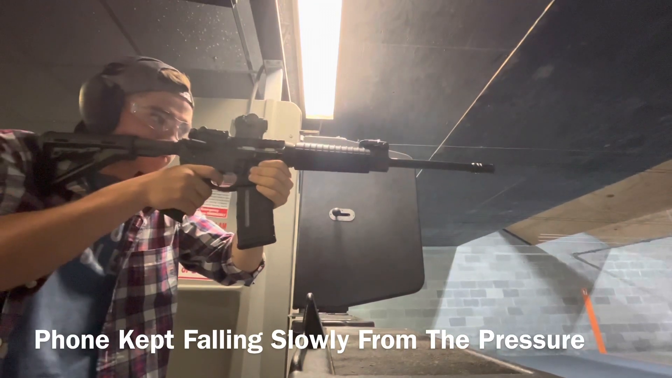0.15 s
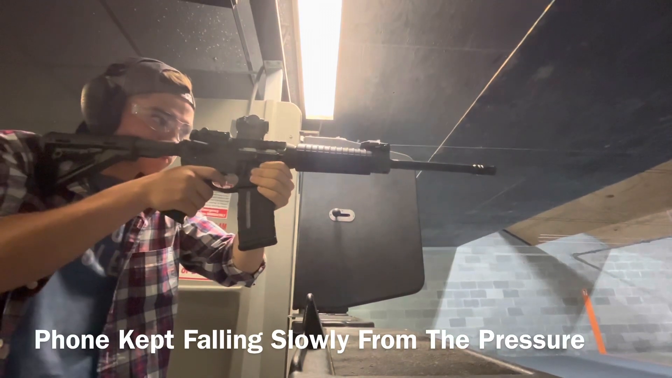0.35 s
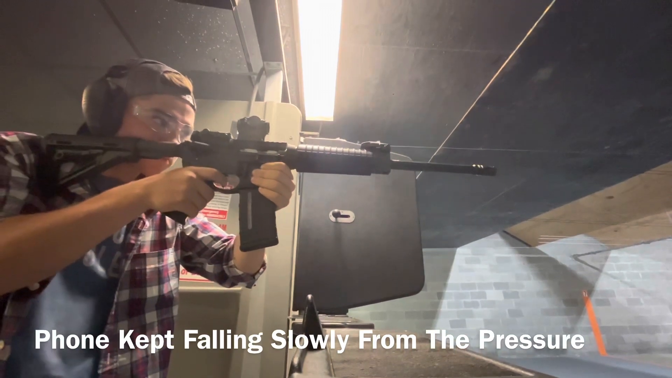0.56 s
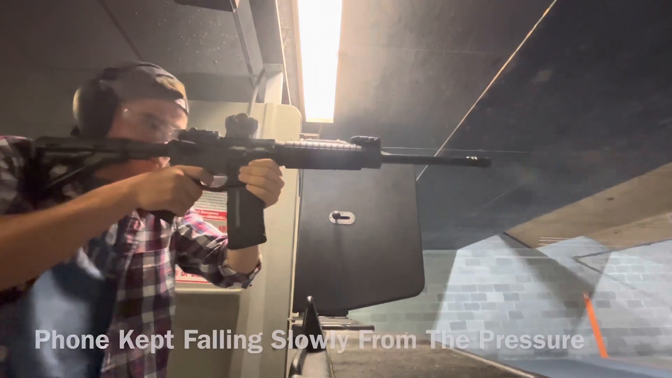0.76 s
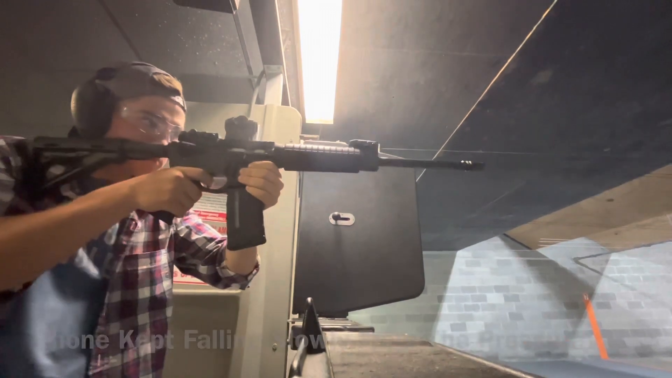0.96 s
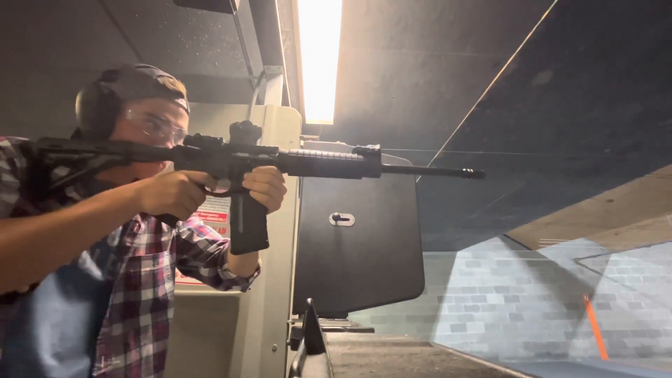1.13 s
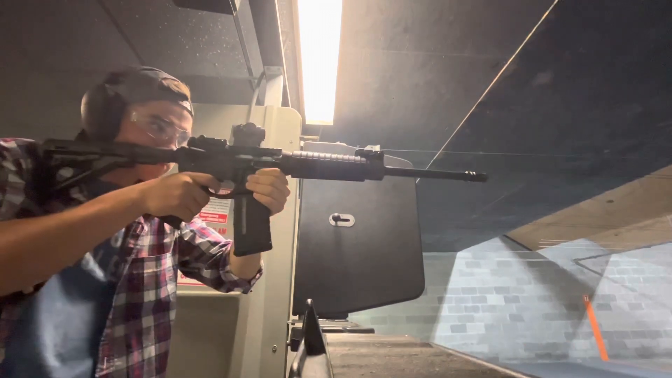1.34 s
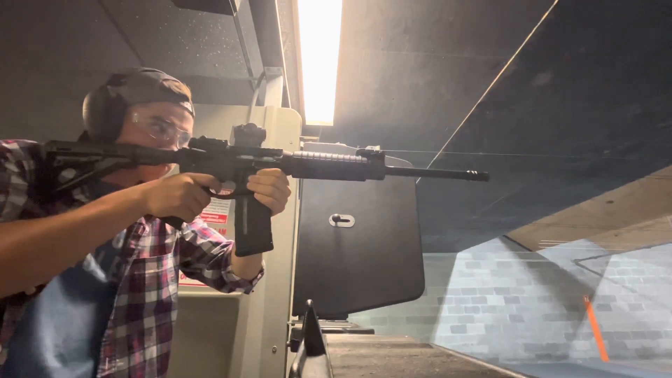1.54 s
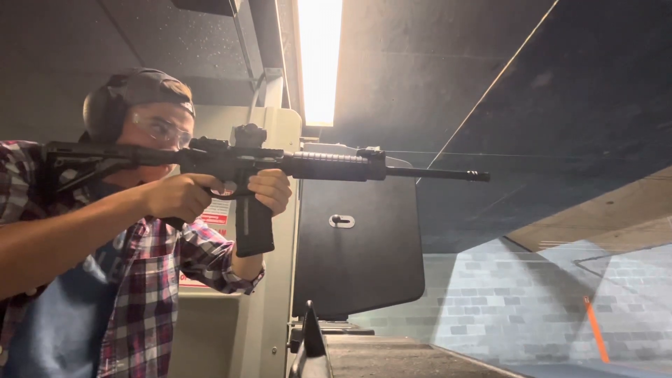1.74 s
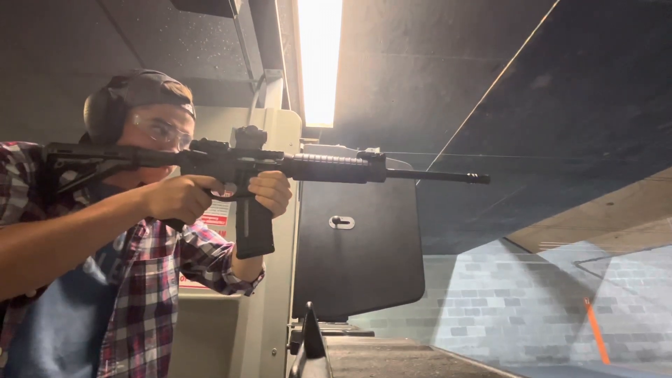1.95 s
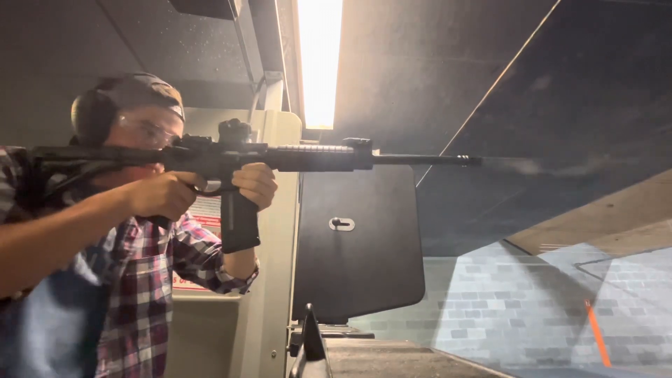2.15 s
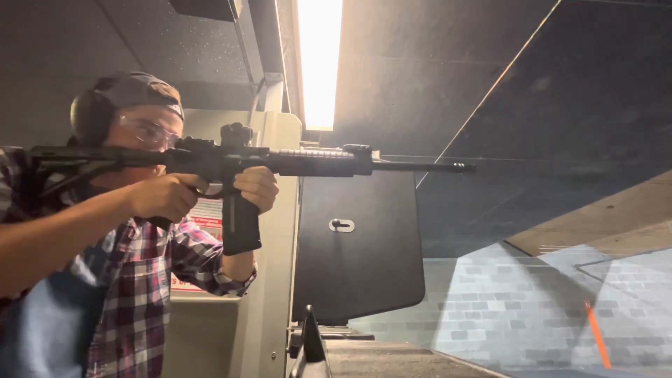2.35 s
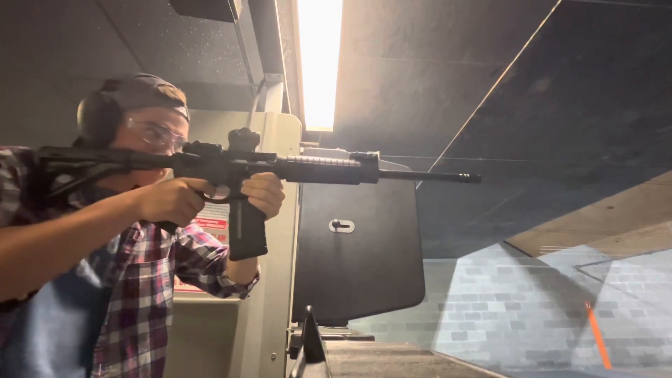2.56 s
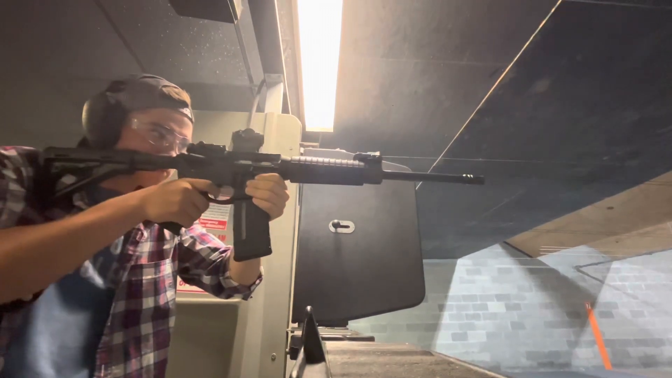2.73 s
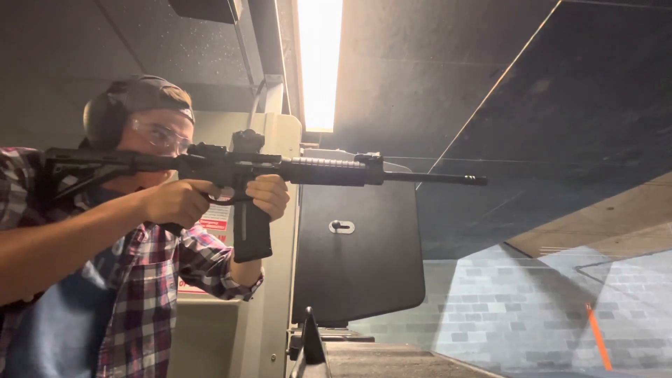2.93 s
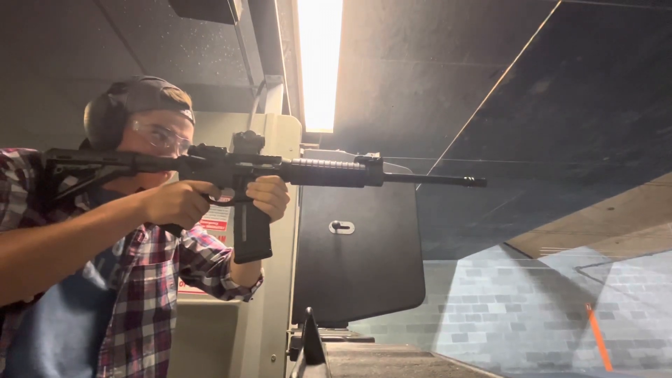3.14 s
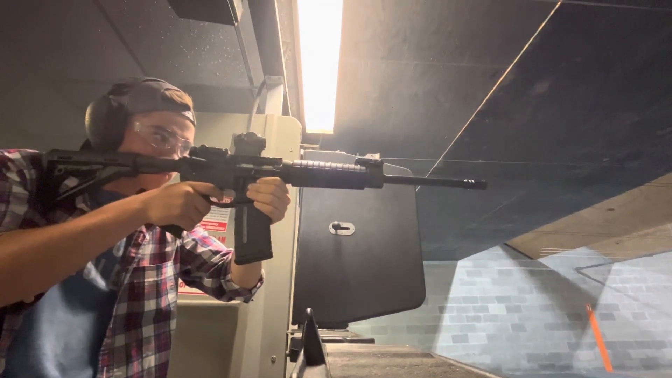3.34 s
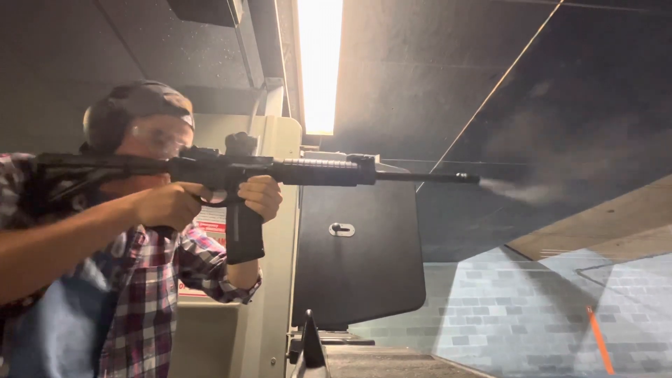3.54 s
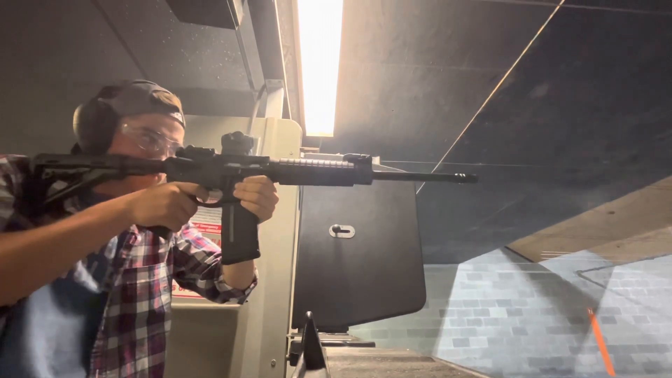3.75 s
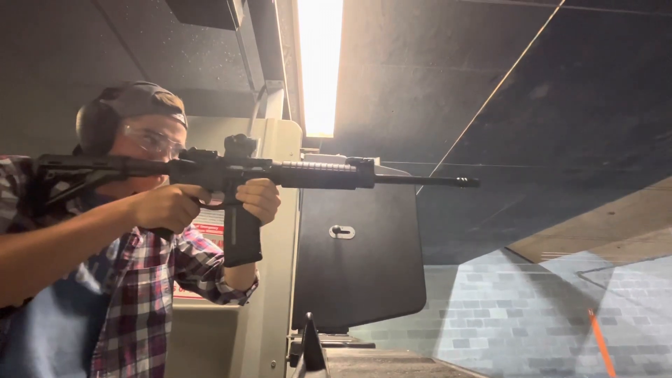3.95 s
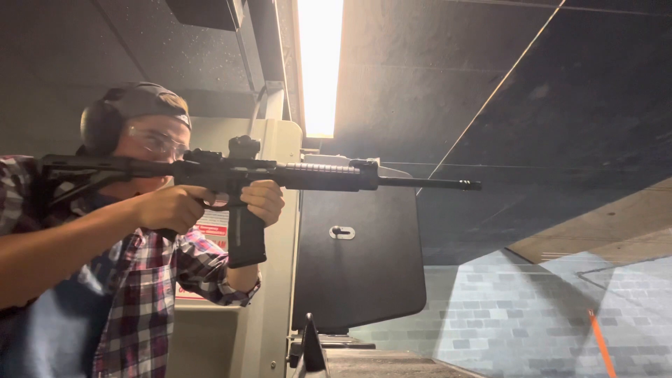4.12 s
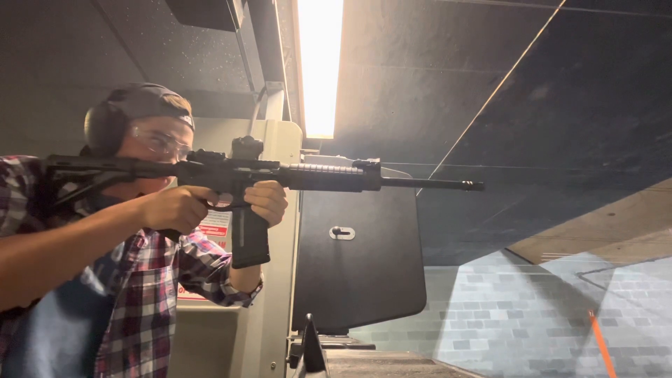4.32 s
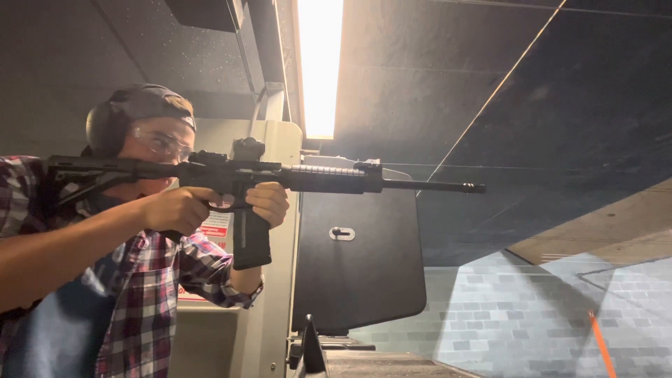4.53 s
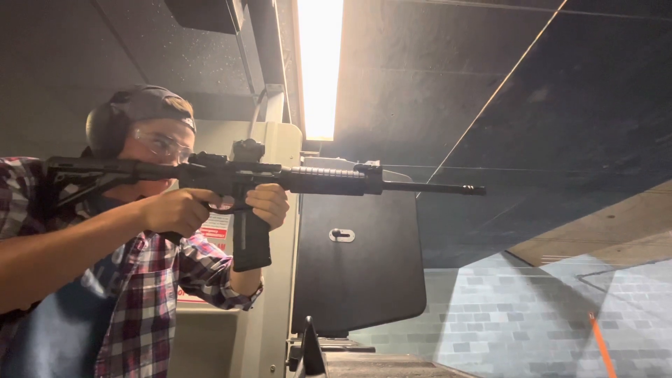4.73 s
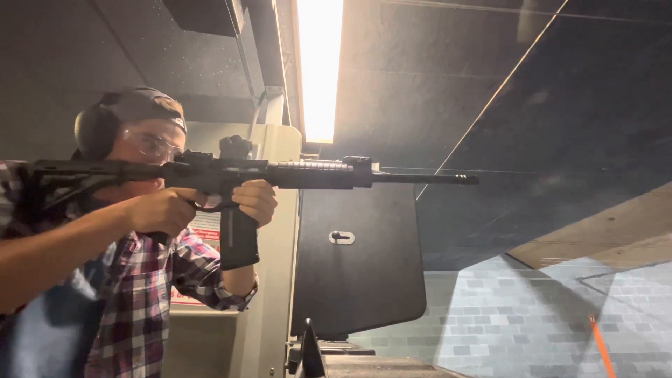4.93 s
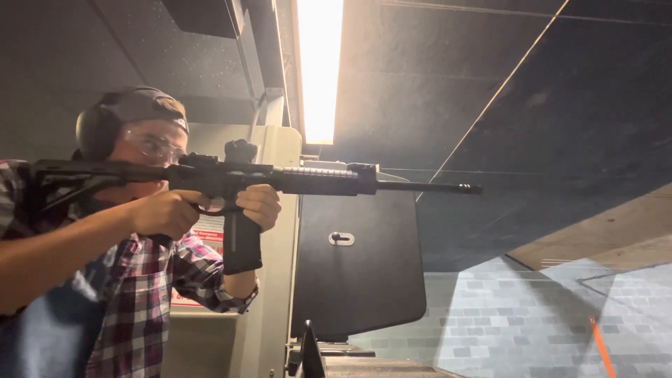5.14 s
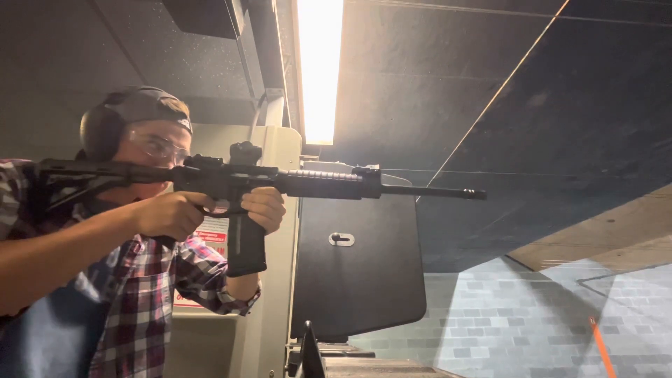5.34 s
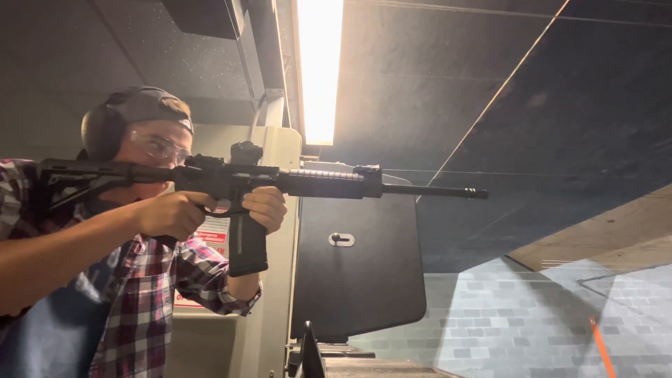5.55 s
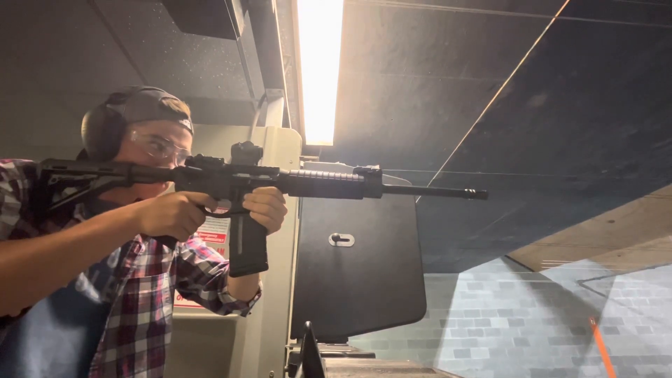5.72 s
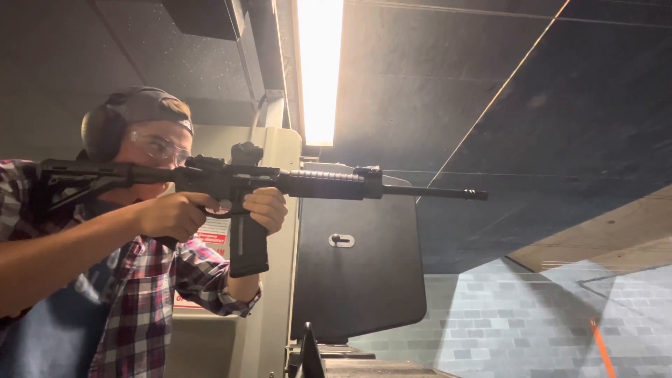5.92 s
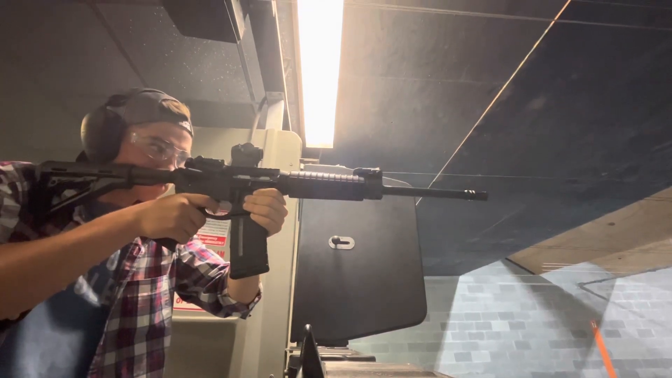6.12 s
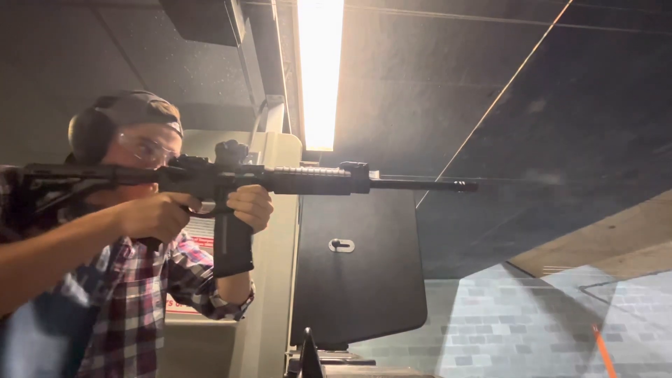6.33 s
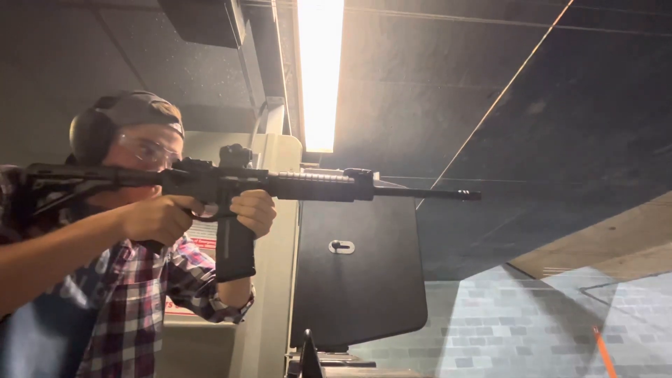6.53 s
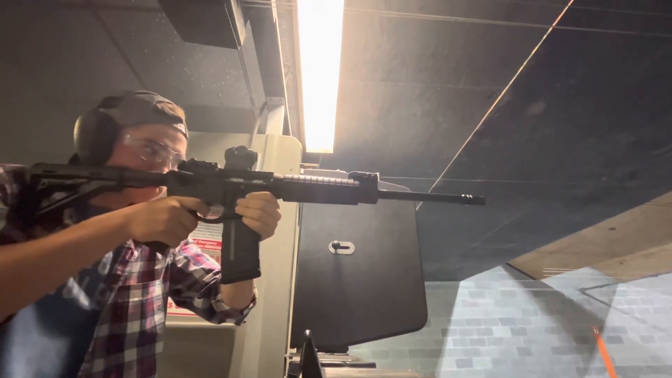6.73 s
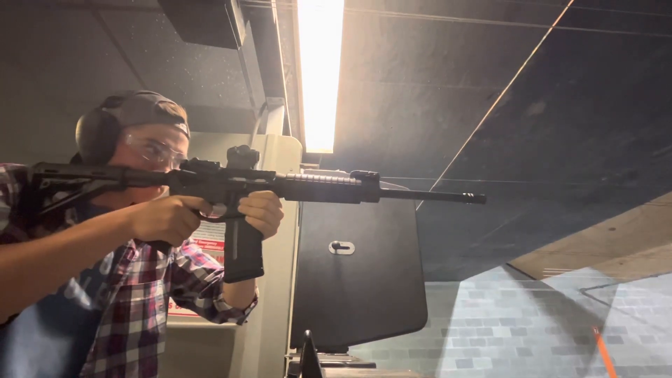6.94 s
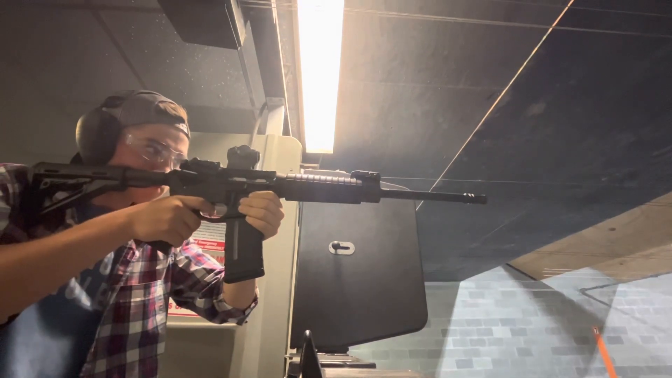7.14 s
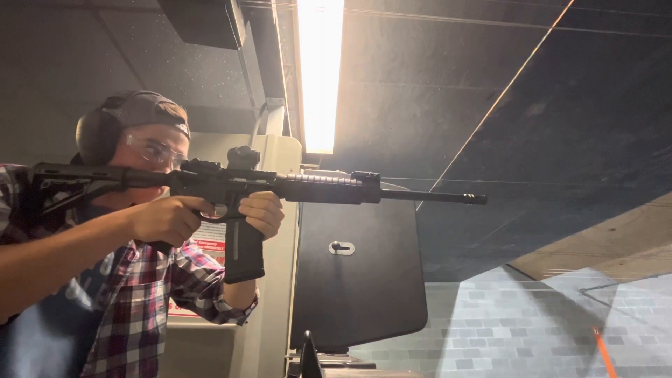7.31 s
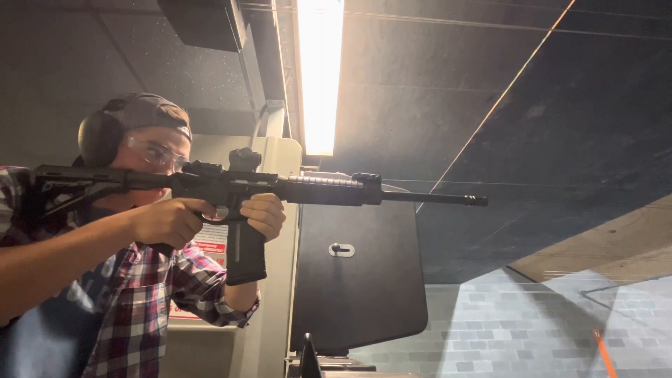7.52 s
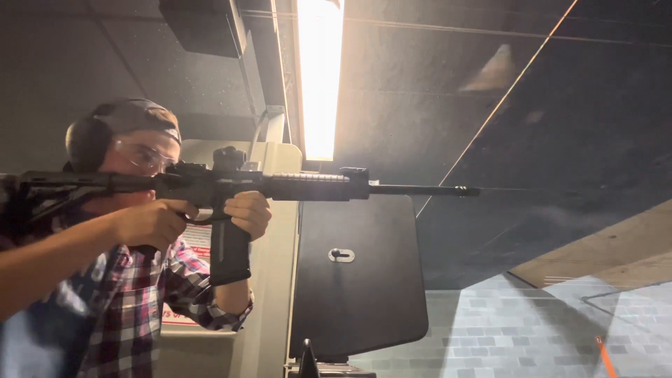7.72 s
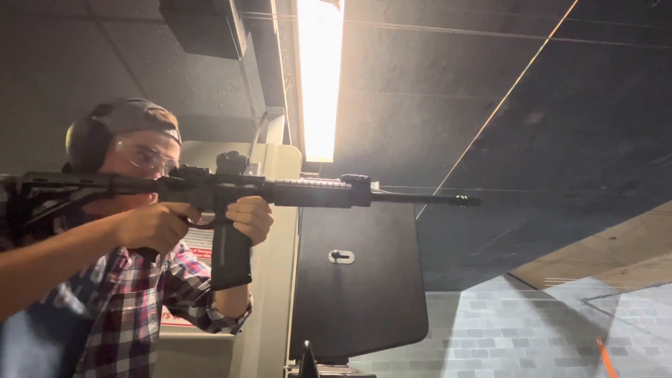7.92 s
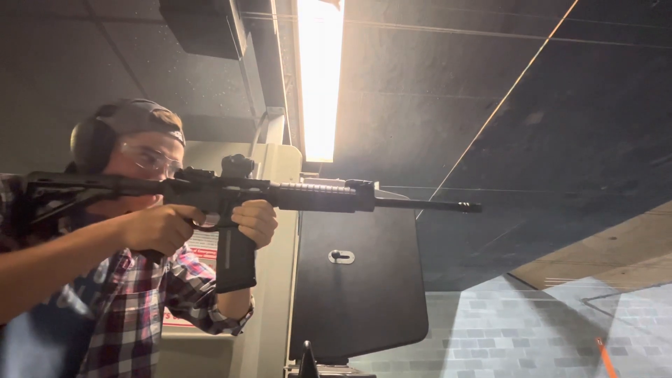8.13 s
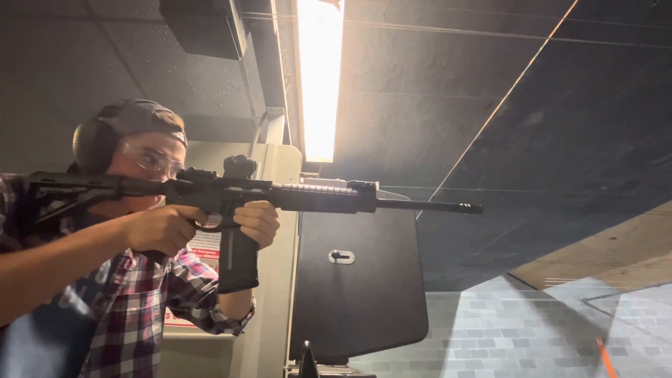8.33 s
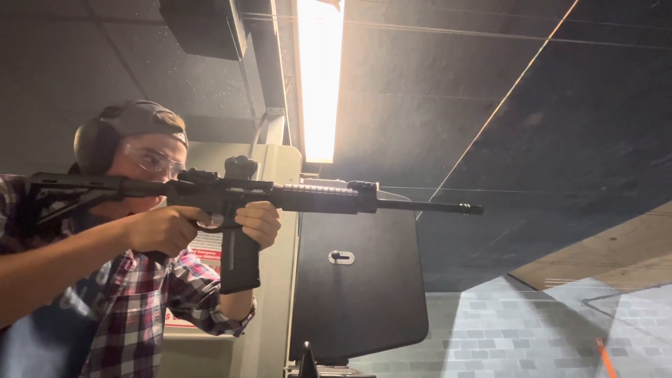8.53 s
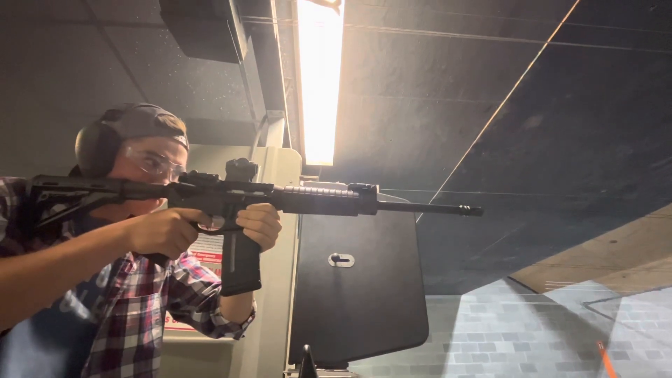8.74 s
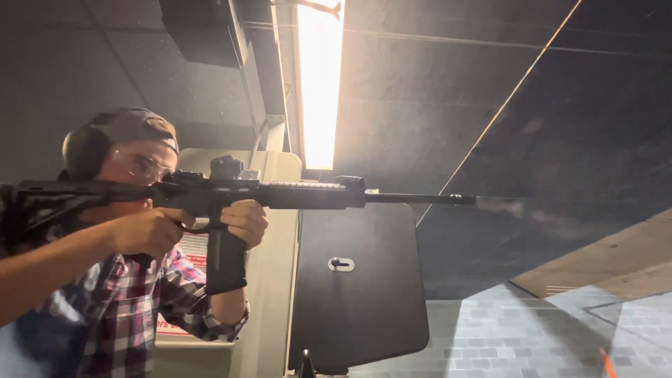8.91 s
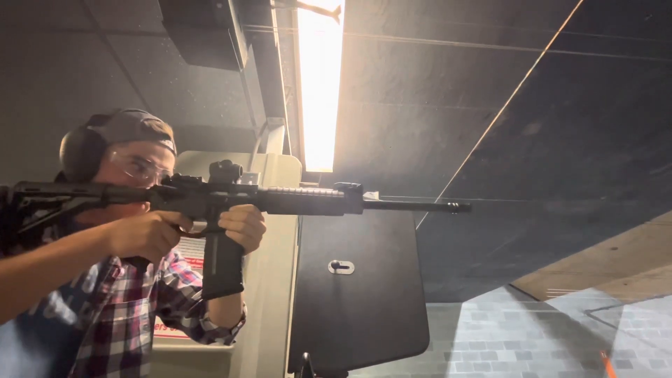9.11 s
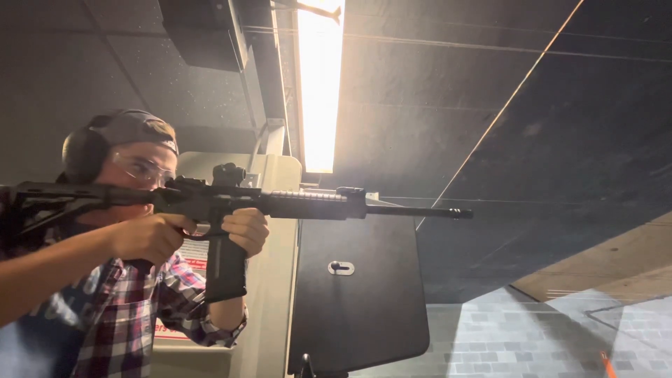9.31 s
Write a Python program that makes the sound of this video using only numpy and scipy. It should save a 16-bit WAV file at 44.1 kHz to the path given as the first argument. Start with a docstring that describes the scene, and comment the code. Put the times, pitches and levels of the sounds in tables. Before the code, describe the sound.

Close rifle fire in a hard, reverberant hall: seven steady single shots, each a sudden blast with a low thump and a second-long rolling decay. Before them, the tail of an older shot and a short boxy report from a neighbouring lane. After most shots a spent case drops with a tinkle and dull boom, and the trigger clicks. Ventilation hums; the phone slightly rounds off the peaks.

```python
"""A concrete indoor rifle range, heard from the shooting booth on a phone's two microphones.
Ventilation hums throughout. An earlier report is dying away as a boxier shot comes from another lane,
then a rifle fires seven single shots. Shaped noise and standing waves make the hall's long roar.
After most shots a brass case drops and tinkles, modes and a noise tick, and the trigger clicks as it resets.
"""
import sys
import numpy as np
from scipy import signal
from scipy.fft import rfft, irfft, next_fast_len
from scipy.io import wavfile
from scipy.ndimage import uniform_filter1d

SR = 44100
rng = np.random.default_rng(int(sys.argv[2]) if len(sys.argv) > 2 else 0)


def pcm_store(signal):
    """Save signal as 16-bit PCM."""
    levels = np.round(np.clip(np.atleast_2d(signal), -1, 1) * 32767)
    wavfile.write(sys.argv[1], SR, levels.astype(np.int16).T)


N = 417627
T = np.arange(int(1.6 * SR)) / SR  # time since a shot or blow [s]
TOP_HZ = 15200  # the phone's band limit

# ventilation air: (frequency [Hz], relative density [dB per Hz])
VENT_SPECTRUM = [(25, -30), (65, -10), (100, -9), (135, -9), (180, -5), (235, -9), (290, 1), (460, -1.5),
                 (800, -8), (2000, -18), (5000, -29), (14000, -45)]
# fan and duct tones: (frequency [Hz], level before the side trim [dB], width [Hz])
FAN_TONES = [(70.5, -85, 3), (285, -73, 26), (339, -78, 16), (455, -80, 20), (585, -79, 12), (625, -83, 14)]

# the hall's decay before each shot's stretch: (frequency [Hz], t60 [s])
HALL_DECAY = [(50, 1), (180, 1.06), (300, 1.137), (600, 1.134), (2000, 1.06), (5000, 0.96), (10000, 0.7),
              (14000, .55)]
# how far below full strength the roar starts, before scaling: (frequency [Hz], depth [dB])
ROAR_BUILD = [(100, 9.5), (250, 7.5), (550, 23), (1100, 10.5), (2200, 8), (5000, 4), (10000, 3)]
# likeness of the left and right channels late in the roar, one shared sound at the very top:
# (frequency [Hz], likeness [-1 to 1])
CHANNEL_LIKENESS = [(50, 0.7), (200, 0.4), (600, 0.3), (1100, 0.23), (1650, -.2), (2400, .15), (6000, 0.16),
                    (10000, 0.4), (12000, 1)]
# balance of the roar: (frequency [Hz], left minus right [dB])
LEFT_LEAN = [(100, 3), (600, -2), (1300, 3.5), (2500, 3), (4000, 6), (6500, 9.5), (8000, 2), (9500, -0.5),
             (12000, -0.5)]
# the hall's strongest standing waves: (frequency [Hz], level before trim and shot colour [dB])
STANDING_WAVES = [(114, -47.5), (143, -45.5), (252, -44), (319, -37), (403.5, -36.5), (502.5, -36),
                  (542, -39), (650, -33), (774, -27), (965, -32), (994, -41), (1168, -46.5), (1288, -37.5),
                  (1319, -43.5), (1392, -37), (1419, -36), (1584, -40.5), (1627, -44.5), (1867, -50.5),
                  (1968, -42), (2072, -45)]
# the hall's deepest modes: (frequency [Hz], level before shot colour [dB], t60 [s])
DEEP_MODES = [(53, -47, 2.1), (69.6, -40, 1.6)]
# low echoes pass to and fro between the side walls
FLUTTER_S, FLUTTER_DB, FLUTTER_FADE_S, FLUTTER_HZ = .053, 1, .18, 430
# the blast runs down the range and back, so the roar comes in swells that even out
FIRST_SWELL_S, ROUND_TRIP_S, SWELL_DB, SWELL_FADE_S = .17, .25, 2, .5
SWELL_HZ, SWELL_OCTAVES = 650, 1.3  # the band that the far wall throws back

# report from the other lane: (frequency [Hz], relative density [dB per Hz])
OTHER_GUN_SPECTRUM = [(25, -30.5), (100, -16), (250, -14), (340, -1), (700, 3), (1000, 3.5), (1450, -3),
                      (2000, -14), (3800, -15.5), (7000, -24.5), (10800, -30.5), (13900, -38.5),
                      (15000, -66)]
# pressure wave at the phone: (frequency [Hz], relative density [dB per Hz])
THUMP_SPECTRUM = [(25, -16), (55, -3.5), (130, 4), (240, -0.5), (400, -13), (900, -39), (2000, -92.5)]

# spent cases: (landing time [s], ring level before trim [dB], thud level [dB], first flight after landing [s])
CASE_LANDINGS = [(1.327, -60, -58.5, .339), (2.734, -55.5, -51.5, .405), (4.288, -67.5, -59, .355),
                 (5.401, -68, -64, .32), (6.845, -73, -58.5, .31), (8.185, -61.5, -50, .374)]
# brass case: (frequency before pitch spread [Hz], relative level [dB], t60 [s])
BRASS_MODES = [(9512, -26, .3), (10700, -11, .8), (12310, -22, .2), (12760, -22, .2), (14950, -1, .5)]
# sheet that the cases drop on: (frequency [Hz], relative level [dB], t60 [s])
SHEET_MODES = [(178, -4.5, 0.57), (178, -3.5, 0.91), (294, 1.5, .8), (346, -3, 1)]
CONTACT_COUNT, FLIGHT_SHRINK = 3, .4  # landing and bounces; each flight over the one before
RING_LOSS_DB, THUD_LOSS_DB = 8, 18  # lost at each bounce

# trigger resets: (time [s], level before trim [dB])
TRIGGER_RESETS = [(1.7175, -55), (3.1886, -53.5), (4.402, -52.5), (5.893, -53.5), (7.1043, -52),
                  (8.4446, -54)]
# snap of the trigger parts: (frequency [Hz], relative density [dB per Hz])
SNAP_SPECTRUM = [(470, -29), (800, -6), (2260, -13.5), (4020, -12.5), (7490, -19), (8570, -26),
                 (12200, -22.5), (13800, -38), (14900, -31.5)]
# steel trigger parts: (frequency before pitch factor [Hz], relative level [dB], t60 [s])
STEEL_MODES = [(2690, 3.5, .03), (3580, 0, .03), (3950, 0, .03), (6160, 0, .025), (10600, -13, .025),
               (12400, -12.5, .02)]

# rifle shots: (time [s], roar level [dB], bass colour [dB], body colour [dB],
#               length of the low ring [factor], thump level [dB])
RIFLE_SHOTS = [(.657, -13.5, -3, -5.5, 1.09, -31), (2.027, -14.5, -5, 2.5, 1.16, -26),
               (3.509, -15, 3.5, 1, 1.08, -24.5), (4.757, -14.5, -2.5, 2.5, 1.01, -30.5),
               (6.147, -14.5, -4, 2, 0.95, -29), (7.567, -15, 4.5, 0.5, 1.15, -19.5),
               (8.790, -14.5, 4, 0, 1.22, -31.5)]
# rifle blast: (frequency [Hz], relative density [dB per Hz])
BLAST_SPECTRUM = [(25, -34), (50, -19.5), (110, -16.5), (138, -14), (200, -10), (260, -7.5), (370, -1),
                  (520, 0), (1300, -5.5), (2200, -12), (5500, -21.5), (9800, -28), (13900, -39.5),
                  (15000, -72.5)]


def amp(db):
    """Decibels to gain."""
    return 10 ** (np.asarray(db) / 20)


def unit(x):
    """Scale to rms 1."""
    return x / np.sqrt(np.mean(x ** 2) + 1e-20)


def along(points, hz):
    """Read (frequency [Hz], value) points on a log axis."""
    f, v = np.transpose(points)
    return np.interp(np.log(hz + 1), np.log(f + 1), v)


def hump(hz, centre_hz, octaves):
    """A bell on the log-frequency axis."""
    return np.exp(-(np.log2((hz + 1) / centre_hz) / octaves) ** 2)


def filtered(x, response):
    """Multiply the spectrum of x by a response of frequency."""
    size = x.shape[-1]
    m = next_fast_len(size + 8192)
    hz = np.fft.rfftfreq(m, 1 / SR)
    return irfft(rfft(x, m) * response(hz), m)[..., :size]


def coloured(x, spectrum):
    """Give a sound the colour of a spectrum table, at rms 1."""
    return unit(filtered(x, lambda hz: amp(along(spectrum, hz))))


def noise(spectrum, size):
    """Two unrelated noises with the given colour."""
    return coloured(rng.standard_normal((2, size)), spectrum)


def add(track, s, sound):
    """Mix a sound into the track from time s."""
    part = track[:, max(round(s * SR), 0):]
    part[:, :sound.shape[-1]] += sound[..., :part.shape[1]]


def ringing(modes, pitch):
    """A struck object's modes, at new strengths for each blow and each microphone."""
    t = T[:SR]
    hz, db, t60 = np.transpose(modes)[:, :, None]
    tones = np.exp(-np.log(1000) * t / t60) * np.sin(2 * np.pi * hz * pitch * t)
    strengths = amp(db.T + rng.normal(0, 2.5, (2, len(modes))))
    return strengths @ tones


def ventilation(air_db=-73, side_db=-4):
    """Rushing air with wavering fan and duct tones, spread between the two microphones."""
    def tones(hz):
        response = 0
        for centre, db, width in FAN_TONES:
            # noise in a narrow resonance, scaled to its own rms level
            scale = np.sqrt(2 * SR / (np.pi * width))
            response = response + amp(db) * scale / (1 + (2 * (hz - centre) / width) ** 2)
        return response

    air = amp(air_db) * noise(VENT_SPECTRUM, N)
    mid, side = air + filtered(rng.standard_normal((2, N)), tones)
    return np.array([mid + amp(side_db) * side, mid - amp(side_db) * side])


def diffuse(spectrum):
    """A dense train of echoes whose energy is spread fairly evenly over time and frequency."""
    z = signal.stft(rng.standard_normal((2, len(T))), nperseg=4096)[2]
    power = np.abs(uniform_filter1d(np.abs(z) ** 2, size=15, axis=1))
    even = signal.istft(z / np.sqrt(power + 1e-12), nperseg=4096)[1][:, :len(T)]
    return coloured(even, spectrum)


def roar_db(hz, t, stretch, build, full_s=.14, build_s=.042):
    """The hall's answer builds up, then dies, swelling once for each trip between its walls."""
    decay = -60 * (t - full_s) / (along(HALL_DECAY, hz) * stretch)
    swell_phase = 2 * np.pi * (t - FIRST_SWELL_S) / ROUND_TRIP_S
    swell = SWELL_DB * np.exp(-t / SWELL_FADE_S) * np.cos(swell_phase)
    flutter = FLUTTER_DB * np.exp(-t / FLUTTER_FADE_S) * np.cos(2 * np.pi * t / FLUTTER_S)
    waves = swell * hump(hz, SWELL_HZ, SWELL_OCTAVES) + flutter * hump(hz, FLUTTER_HZ, .9)
    return decay - build * along(ROAR_BUILD, hz) * np.exp(-t / build_s) + waves


def hall(echoes, stretch, low_ring, build, ring_hz=250, apart=1.2, apart_s=.068,
         shade_db=5, shade_s=.22, lag_rad=1.7, lag_hz=470, lag_s=.4):
    """Shape a dense train of echoes into the hall's answer in the left and right channels."""
    hz, t, (a, b) = signal.stft(echoes, SR, nperseg=512)
    hz = hz[:, None]
    # the first wall echoes hit the two microphones differently; the late field is alike in the bass
    likeness = along(CHANNEL_LIKENESS, hz) * (1 - apart * np.exp(-t / apart_s))
    turn = np.arccos(np.clip(likeness, -1, 1)) / 2
    shared, opposed = np.cos(turn) * a, np.sin(turn) * b
    pair = np.array([shared + opposed, shared - opposed])
    # the low roar reaches the left microphone late until the field is diffuse
    lag = lag_rad * hump(hz, lag_hz, .75) * np.exp(-t / lag_s)
    pair = pair * np.exp(.5j * np.array([-lag, lag]))
    # the midrange leans left at first
    lean = along(LEFT_LEAN, hz) + shade_db * np.exp(-t / shade_s) * hump(hz, 700, 1)
    level = roar_db(hz, t, stretch * low_ring ** hump(hz, ring_hz, 1.2), build)
    shaped = pair * amp(level + np.array([lean, -lean]) / 2)
    return signal.istft(shaped, SR, nperseg=512)[1][:, :len(T)]


def standing_waves(modes_db=1, spread_rad=.87):
    """Single modes stand out of the roar, each with its own phase at each microphone."""
    def tone(hz):
        phase = rng.uniform(0, 2 * np.pi) + spread_rad * rng.standard_normal((2, 1))
        return np.sqrt(2) * np.sin(2 * np.pi * hz * T + phase)

    ring = np.zeros((2, len(T)))
    for hz, db in STANDING_WAVES:
        ring += amp(db + modes_db + roar_db(hz, T, .96, 1)) * tone(hz)
    for hz, db, t60 in DEEP_MODES:
        ring += amp(db - 60 * T / t60) * tone(hz)
    return ring


def thump(t60=.52, common_db=-7):
    """The pressure wave shakes the phone and pushes its two ports mostly against each other."""
    against, common = noise(THUMP_SPECTRUM, len(T)) * amp(-60 * T / t60)
    return np.array([against, -against]) + amp(common_db) * common


def earlier_shot(level_db=-17, age_s=.7):
    """The last of an earlier report is still dying away in the hall."""
    out = np.zeros((2, N))
    roar = amp(level_db) * hall(noise(BLAST_SPECTRUM, len(T)), .87, 1, 1)
    add(out, 0, roar[:, round(age_s * SR):])
    return out


def other_lane(s=.195, level_db=-14, stretch=.81, low_ring=.68, build=2.4,
               slap_db=-11.5, slap_t60=.24, slap_hz=3000, thump_db=-19, thump_t60=.22):
    """A boxier, shorter report: a thump and a dull slap off the booth walls, then the hall swells."""
    out = np.zeros((2, N))
    slap = filtered(diffuse(OTHER_GUN_SPECTRUM), lambda hz: 1 / (1 + (hz / slap_hz) ** 2))
    slap = slap * amp(slap_db - 60 * T / slap_t60)
    roar = amp(level_db) * hall(diffuse(OTHER_GUN_SPECTRUM), stretch, low_ring, build, ring_hz=696)
    report = slap + roar + amp(thump_db) * thump(thump_t60)
    add(out, s, report * (1 - np.exp(-T / .001)))  # 1 ms onset
    return out


def contacts():
    """Each case lands and bounces, every flight shorter and every contact softer."""
    found = []  # (time [s], ring level before trim [dB], thud level [dB])
    for s, ring_db, thud_db, flight_s in CASE_LANDINGS:
        for k in range(CONTACT_COUNT):
            flown_s = flight_s * sum(FLIGHT_SHRINK ** j for j in range(k))
            found.append((s + flown_s, ring_db - RING_LOSS_DB * k, thud_db - THUD_LOSS_DB * k))
    return found


def cases(tick_db=3, tick_t60=.05, tick_hz=9500, spread_s=.024, tumble_hz=45, brass_db=-2):
    """Each contact is a bright tick, a thin tumbling ring and a dull boom spreading through the sheet."""
    out, t = np.zeros((2, N)), T[:SR]
    for s, ring_db, thud_db in contacts():
        pitch = rng.normal(1, .005)
        tick = filtered(rng.standard_normal((2, SR)), lambda hz: 1 - 1 / (1 + (hz / tick_hz) ** 6))
        tick = tick * amp(tick_db - 60 * t / tick_t60)
        # the ring flutters as the case tumbles
        tumble = filtered(rng.standard_normal((2, SR)), lambda hz: 1 / (1 + (hz / tumble_hz) ** 2))
        ring = amp(brass_db) * unit(tumble) * ringing(BRASS_MODES, pitch)
        add(out, s, amp(ring_db) * (ring + tick))
        boom = ringing(SHEET_MODES, 1) * (1 - np.exp(-t / spread_s))
        add(out, s, amp(thud_db) * boom)
    return out


def click(snap_t60=.054, ring_db=-14, room_db=-24, room_t60=.3):
    """A small steel part snaps over and rings briefly, with a trace of the hall."""
    t = T[:SR]
    envelope = amp(-60 * t / snap_t60) + amp(room_db - 60 * t / room_t60)
    return noise(SNAP_SPECTRUM, SR) * envelope + amp(ring_db) * ringing(STEEL_MODES, .94)


def trigger(level_db=-3):
    """The trigger clicks forward as the finger lets go."""
    out = np.zeros((2, N))
    for s, db in TRIGGER_RESETS:
        add(out, s, amp(db + level_db) * click())
    return out


def rifle(steady_hz=3200, hammer_db=-38):
    """The muzzle stays put, so the low echoes mostly repeat from shot to shot; the treble is largely new."""
    def same(hz):
        return .93 / np.sqrt(1 + (hz / steady_hz) ** 4)

    out = np.zeros((2, N))
    walls, modes = diffuse(BLAST_SPECTRUM), standing_waves()
    for s, db, bass_db, body_db, low_ring, thump_db in RIFLE_SHOTS:
        repeated = filtered(walls, same)
        fresh = filtered(noise(BLAST_SPECTRUM, len(T)), lambda hz: np.sqrt(1 - same(hz) ** 2))
        roar = amp(db) * hall(repeated + fresh, .97, low_ring, 1) + modes
        roar = filtered(roar, lambda hz: amp(bass_db * hump(hz, 110, 2) + body_db * hump(hz, 570, 1.1)))
        report = roar + amp(thump_db) * thump()
        add(out, s, report * (1 - np.exp(-T / .001)))  # 1 ms onset
        # the hammer falls 8 ms before the blast
        add(out, s - .008, amp(hammer_db) * click())
    return out


def scene():
    """Everything heard from the shooting booth."""
    return ventilation() + earlier_shot() + other_lane() + cases() + trigger() + rifle()


def record(dry):
    """The phone rounds off the highest peaks and cuts steeply above its band limit."""
    rounded = dry / (1 + np.abs(dry) ** 6) ** (1 / 6)
    return filtered(rounded, lambda hz: 1 / np.sqrt(1 + (hz / TOP_HZ) ** 160))


dry = scene()
out = record(dry)
pcm_store(out)
```